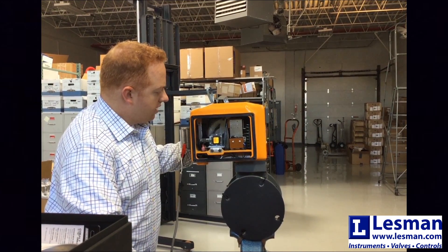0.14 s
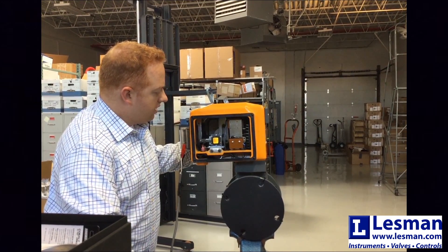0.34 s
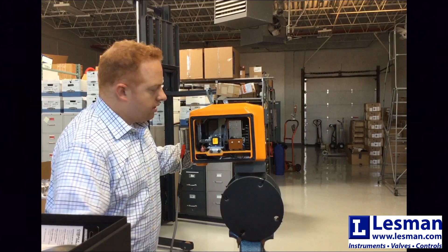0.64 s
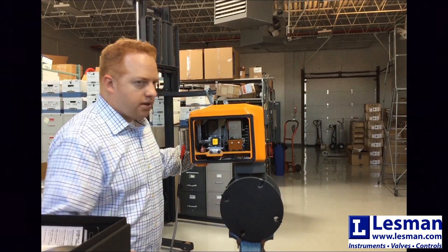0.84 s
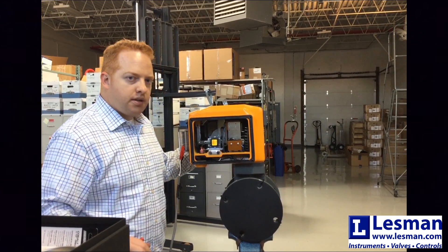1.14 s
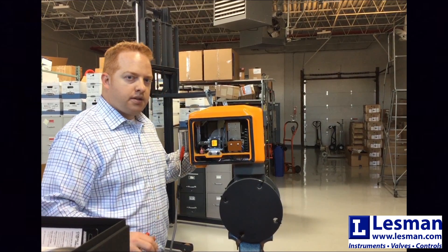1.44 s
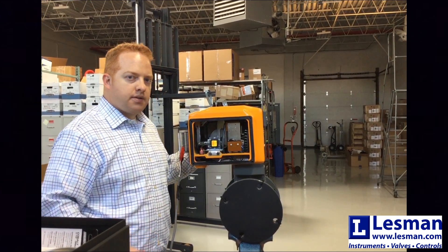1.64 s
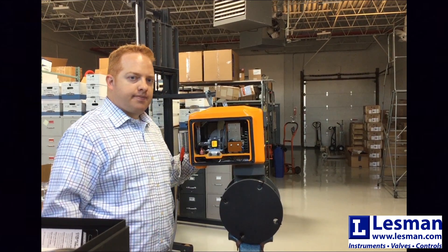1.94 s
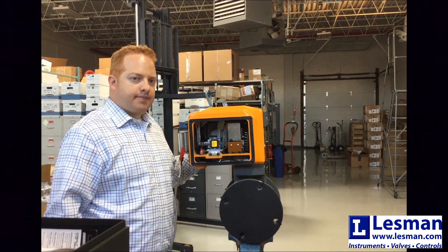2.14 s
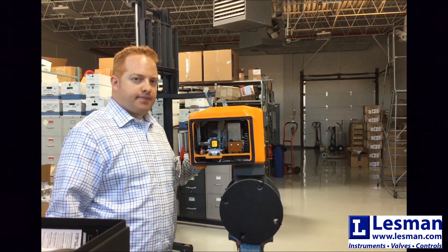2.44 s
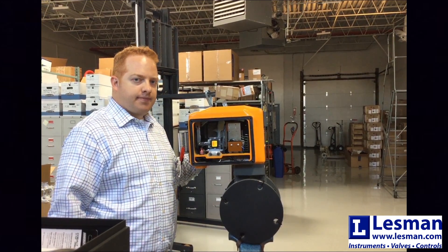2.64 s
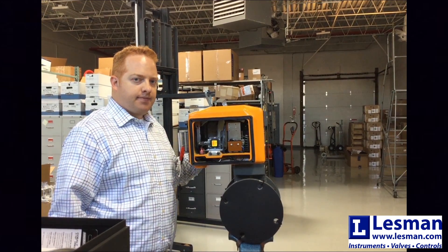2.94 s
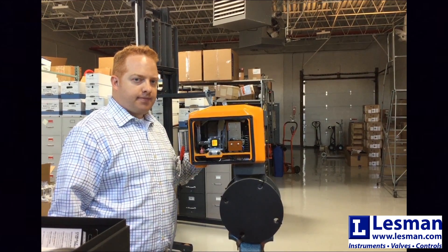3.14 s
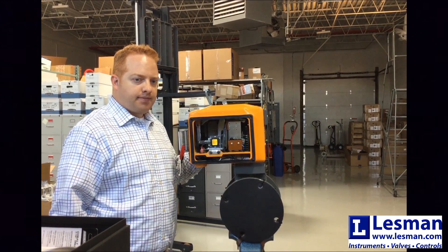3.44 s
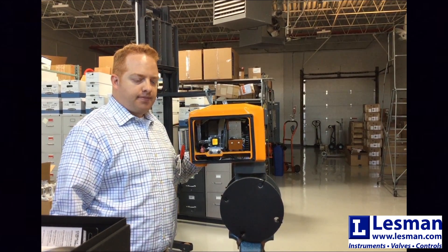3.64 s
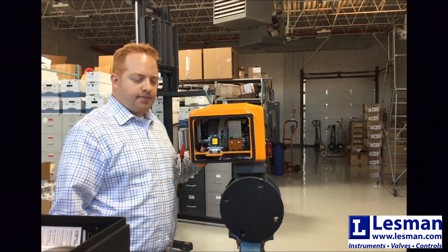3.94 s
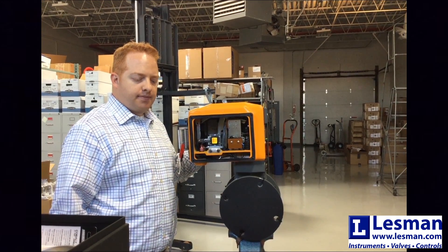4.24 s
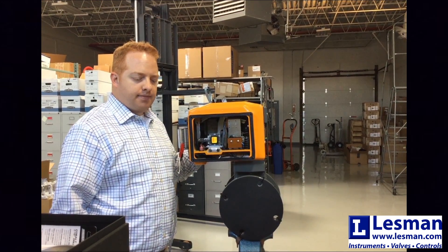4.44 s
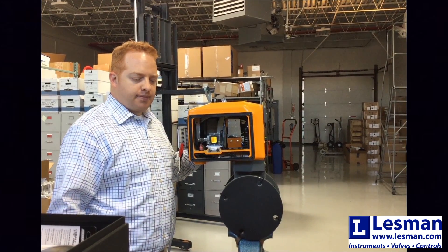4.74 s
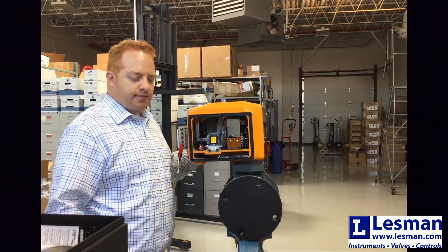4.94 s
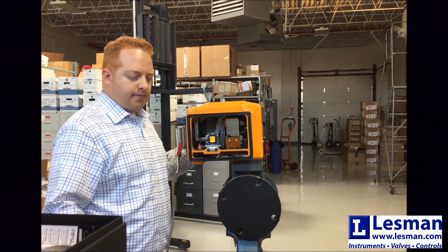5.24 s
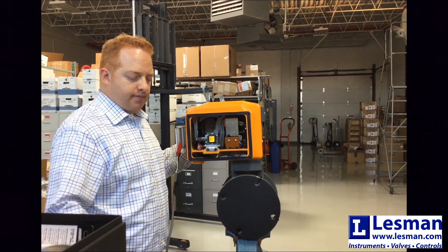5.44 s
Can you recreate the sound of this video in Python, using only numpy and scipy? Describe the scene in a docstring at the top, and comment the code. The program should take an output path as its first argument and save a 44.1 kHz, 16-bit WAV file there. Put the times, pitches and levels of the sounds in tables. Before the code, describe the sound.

In a large, hard-walled warehouse, an electric valve actuator hums over soft ventilation. Two small clicks lead straight into a loud solenoid snap that rings the casing, briefly overloads the microphone and echoes through the hall. The motor then takes up the valve and slows slightly. A few switches click, and the gears whine on steadily with a light rasp and a gentle throb.

```python
"""An electric valve actuator with an open housing, in a large, hard-walled warehouse.
Its geared induction motor hums almost unloaded over the ventilation while an earlier snap dies in the hall.
Two small clicks, then at 0.3 s a solenoid slams home, rings the casing and overloads the microphone.
From 0.9 s the motor takes up the valve and slows a little; a few switches click, and the drive
whines on, throbbing with its eccentric gears."""
import sys
import numpy as np
from scipy import signal
from scipy.fft import rfft, irfft, next_fast_len
from scipy.io import wavfile

SR = 44100
rng = np.random.default_rng(int(sys.argv[2]) if len(sys.argv) > 2 else 0)


def transcribe(signal):
    """Save signal, clipped to [-1, 1], as a 16-bit WAV file at the path in sys.argv[1]."""
    frames = np.atleast_2d(signal).T
    limited = np.clip(frames, -1, 1)
    pcm = np.round(limited * 32767).astype(np.int16)
    wavfile.write(sys.argv[1], SR, pcm)


N = 246546
TIME = np.arange(N) / SR
TAIL_TIME = np.arange(65536) / SR  # seconds since a hit

# bed of ventilation and motor fan: (frequency [Hz], level [dB/Hz])
AIR_BED = [(22, -96.5), (42, -77), (62, -75), (100, -75), (160, -79), (240, -77), (300, -72), (400, -90.5),
           (520, -86.5), (750, -87), (1400, -89), (2600, -85), (4000, -99), (5300, -104), (6500, -103),
           (8000, -108), (11000, -111), (15000, -121)]
# shaft speed against the valve: (time [s], speed [Hz])
SHAFT_SPEED = [(1.05, 57.27), (1.27, 57.04), (1.5, 57.16), (2.62, 56.36), (3.22, 56.8), (3.92, 56.24),
               (4.68, 56.73), (5.26, 56.08), (5.5, 56)]
# torque on the gear train: (time [s], load [0-1])
GEAR_LOAD = [(0, 0.01), (.92, 0.18), (1.12, 0.58), (1.7, 0.6), (2.08, 0.96), (5.59, 0.96)]
# rasp of sliding teeth at full load: (frequency [Hz], level [dB/Hz])
TOOTH_RASP = [(400, -105), (800, -84), (1300, -88.5), (1600, -79.5), (1850, -76.5), (2100, -79),
              (2330, -75), (2550, -82.5), (3000, -83), (3350, -96), (5500, -104), (8200, -104),
              (9600, -108), (15000, -122)]
# rotor tones, plus the gear tone at shaft order 28, which fades when running free: (shaft order, magnetic
# sideband, level [dB], boost when running free [dB])
ROTOR_TONES = [(12, 0, -69, 8.5), (15, 0, -60, 0.5), (16, 0, -59.5, 0), (17, 0, -53.5, 4.5),
               (17, 2, -63, 4), (26, 0, -67, 2), (28, 0, -53.5, -8)]
# gear tones: (shaft order, magnetic sideband, level [dB], loudest at load [1 = full])
MESH_TONES = [(14, 0, -63, 1.05), (17, 1, -52, 0.63), (18, 0, -61, .7), (27, 0, -61.5, .85),
              (29, 0, -60, 0.77), (28, 1, -51.5, 1), (35, -1, -59, .95), (35, 0, -48.5, .75),
              (35, 1, -56.5, 0.53), (42, -1, -53.5, 0.66), (42, 0, -51, 1.1), (42, 1, -63, .58),
              (49, -1, -61, 0.6), (49, 0, -55.5, .8), (49, 1, -55.5, .55), (54, 0, -63.5, 1.07),
              (56, -1, -65, .8), (56, 0, -60.5, .82)]
# brief swells of single tones: (time [s], half width [s], shaft order, boost [dB])
TONE_SWELLS = [(2.15, .18, 28, 8), (4.05, .2, 28, 3), (5.45, .18, 42, 4)]
# eccentric gears pressing the teeth once a turn: (period [shaft turns], swing [dB])
ECCENTRIC_GEARS = [(8, 0.8), (6, 1.26)]
# thin singing of the housing: (frequency [Hz], level [dB/Hz])
HOUSING_SING = [(3900, -125), (4380, -102), (4490, -89), (4600, -99), (5100, -125)]
# faint whistle: (frequency [Hz], final level [dB/Hz])
FAINT_WHISTLE = [(7300, -125), (8150, -98), (8900, -125)]
# low hum of motor and housing: (frequency [Hz], level [dB])
HUM_TONES = [(40.3, -70), (59.2, -59), (120, -54.5), (204.6, -56), (289.2, -56.5), (296.2, -52.5),
             (300, -61), (303.3, -72), (333.2, -59), (360, -63), (396, -69.5), (480, -75)]
# warehouse reverb: (frequency [Hz], level [dB], t60 [s])
HALL_REVERB = [(80, -13, 1.8), (288, -14, 0.68), (479, -5, .8), (700, -6.5, 0.89), (950, -9.5, 0.6),
               (1350, -6.5, 1.06), (2400, -8.5, 0.97), (3576, -9, 1.17), (5554, -14, 0.99),
               (8000, -18.5, 0.68), (14000, -15.5, .3)]
# EQ of the earlier, lighter snap, with little thump: (frequency [Hz], gain [dB])
EARLIER_EQ = [(300, -9), (1000, -6.5), (2500, 1), (8000, 5), (14000, 0)]
# switch and latch clicks:
# (time [s], tick level [dB/Hz], tick centre [Hz], tick t60 [s], ring [Hz], ring level [dB], ring t60 [s])
SWITCH_CLICKS = [(0.2605, -61.5, 1996, 0.09, 1640, -34, 0.25),
                 (0.2829, -58.5, 7800, 0.067, 3700, -25, 0.084),
                 (1.266, -94, 14000, 0.043, 14700, -64, .05), (1.346, -79.5, 9000, 0.052, 4480, -37, 0.031),
                 (1.346, -79, 14000, .03, 9878, -51, .06), (1.3502, -87, 14500, 0.053, 14400, -46, 0.13),
                 (1.732, -59.5, 1940, 0.037, 11400, -46, .03), (1.7353, -64.5, 1310, 0.22, 495, -42, 0.45)]
# brief rubs of sliding parts: (time [s], half width [s], centre [Hz], level [dB/Hz])
SLIDE_RUBS = [(0.272, 0.0086, 9000, -82), (0.316, .003, 3240, -45), (4.74, 0.023, 5670, -93)]
# plunger hits and bounces: (time [s], level [dB], extra crack [dB])
PLUNGER_HITS = [(0.3147, -7.5, 4), (.3160, 0, -0.5), (0.3208, -12.5, -6), (0.3604, -11.5, 1),
                (0.367, -16.5, 3), (0.3882, -21, 1), (.3935, -19.5, 1), (0.435, -24.5, -1.5)]
# ring of the casing: (frequency [Hz], level [dB], t60 [s])
CASING_MODES = [(1312, -12, 0.045), (1672, -11, 0.037), (1678, -23.5, 0.29), (1970, -27.5, 0.38),
                (2340, -34.5, 0.14), (2430, -2, 0.022), (2650, -30, 0.38), (3430, -16.5, .05),
                (3595, -29.5, .25), (4340, -28.5, 0.053), (4700, -39, 0.023), (5850, -11, .022)]
# crack of steel on steel: (frequency [Hz], level [dB/Hz], t60 [s])
STEEL_CRACK = [(200, -73, .1), (800, -58.5, 0.033), (1483, -35.5, 0.048), (2340, -45, 0.035),
               (3487, -49, 0.062), (5910, -45, 0.036), (10020, -50.5, 0.05), (15000, -52.5, 0.041)]
# shiver of the parts around the solenoid: (frequency [Hz], level [dB/Hz], t60 [s])
PARTS_SHIVER = [(25.52, -94, .3), (70, -43, .4), (250, -49.5, 0.42), (494, -50, 0.44), (900, -51.5, 0.49),
                (1610, -46, .3), (3553, -50, 0.47), (7040, -63.5, 0.37), (15000, -60, .23)]
# thump of the flexing cover panels: (frequency [Hz], level [dB], t60 [s], attack [s])
COVER_MODES = [(291.4, 7, 0.138, .012), (265.5, -9, 0.18, 0.0081), (96.2, -25, 0.52, 0.016),
               (203.3, -23.5, .2, .008)]

MAINS_HZ, PINION_TEETH = 60, 7
FREE_HZ, LOADED_HZ = 57.9, 56.25  # shaft speed before take-up, and typical at full load


def undb(db):
    """Decibels to gain."""
    return np.exp(np.asarray(db) * (np.log(10) / 20))


def curve(rows):
    """Automation from (time, value) points."""
    return np.interp(TIME, *np.transpose(rows))


def walk(rate):
    """Random wobble: ramps through rate points a second, spread near 1."""
    step = max(int(SR / rate), 1)
    knots = rng.standard_normal(N // step + 2)
    return 1.16 * (knots[:-1, None] + np.diff(knots)[:, None] * np.arange(step) / step).ravel()[:N]


def bump(s, half):
    """A smooth swell around s seconds."""
    return np.exp(-np.minimum(((TIME - s) / half) ** 2, 20))


def fade(t60):
    """Exponential decay after a hit."""
    return np.exp(-np.minimum(np.log(1000) * TAIL_TIME / t60, 20))


def delay(x, s, size=N):
    """Start a sound at s seconds."""
    return np.pad(x, (max(int(s * SR), 0), max(size - len(x), 0)))[:size]


def colour(x, rows):
    """EQ through (frequency, gain) points."""
    hz, db = np.transpose(rows)[:2]
    size = next_fast_len(len(x))
    pitch = np.log(np.fft.rfftfreq(size, 1 / SR) + 1)
    return irfft(rfft(x, size) * undb(np.interp(pitch, np.log(hz), db)), size)[:len(x)]


def bands(x, hz):
    """Split a sound into overlapping bands that add up to it again."""
    size = next_fast_len(len(x), True)
    spectrum = rfft(x, size)
    pitch = np.log(np.fft.rfftfreq(size, 1 / SR) + 1)
    masks = (np.interp(pitch, np.log(hz), share) for share in np.eye(len(hz)))
    return [irfft(spectrum * mask, size)[:len(x)] for mask in masks]


def noise(size=N):
    """White noise of 0 dB per Hz."""
    return rng.standard_normal(size) * np.sqrt(SR / 2)


def hiss(hz, db, skirt_db=-26):
    """A broad hump of noise around one frequency."""
    return colour(noise(len(TAIL_TIME)), [(hz / 6, db + skirt_db), (hz, db), (hz * 20, db + 2 * skirt_db)])


def sine(cycles):
    """A tone of rms 1 from its running count of cycles."""
    return np.sqrt(2) * np.sin(np.float32(2 * np.pi * (cycles - np.floor(cycles))))


def ring(hz, db, t60):
    """One struck mode."""
    return undb(db) * fade(t60) * np.sin(2 * np.pi * hz * TAIL_TIME)


def burst(rows, hits=((0, 0),)):
    """Noise whose bands die at their own rates; every hit (time, level) adds energy."""
    hz, _, t60s = np.transpose(rows)
    size = len(TAIL_TIME)
    out = 0
    for band, t60 in zip(bands(colour(noise(size), rows), hz), t60s):
        energy = sum(delay(undb(db) * fade(t60), s, size) ** 2 for s, db in hits)
        out += band * np.sqrt(energy)
    return out


def ventilation(waver_db=.92):
    """Moving air lays a soft, wavering bed under the scene."""
    return colour(noise(), AIR_BED) * undb(waver_db * walk(8.1))


def tooth_rasp(turns, load, grind_db, level_db=-2.5, free_db=-7, flicker_db=2):
    """Teeth rasp once a mesh, harder on one side of the pinion and at each magnetic pull."""
    angle = 2 * np.pi * turns
    mesh = 1 + .71 * np.cos(PINION_TEETH * angle)
    lopsided = 1 + .4 * (np.cos(angle) + np.cos(2 * angle))
    pull = 1 + .2 * np.cos(2 * np.pi * 2 * MAINS_HZ * TIME)
    rasp = bands(colour(noise() * mesh * lopsided * pull, TOOTH_RASP), [1208, 1777, 2390, 3100, 5080])
    low, mid, grind, edge, sizzle = (band * undb(flicker_db * walk(24)) for band in rasp)
    # tooth pressure brings up the finest sizzle
    total = low + mid + grind * undb(grind_db) + edge + sizzle * undb(-2 * (1 - load))
    return total * undb(level_db + free_db * (1 - load) ** 2)


def housing(x, t60=.12):
    """Many close, short-lived resonances of the open housing ripple the spectrum."""
    response = rng.standard_normal(len(TAIL_TIME)) * fade(t60)
    wet = signal.fftconvolve(x, response / np.linalg.norm(response))[:N]
    return (x + wet) / np.sqrt(2)


def churn(turns, slip=.24):
    """A swell once a turn of the slower eccentric gear, at a drifting random angle."""
    return np.cos(2 * np.pi * (turns / round(ECCENTRIC_GEARS[0][0]) + rng.random() + slip * walk(3.9)))


def whine(turns, load, off_load_db=-41, waver_db=2, churn_db=1.34, flutter_rad=.11):
    """Rotor and gear tones, some shifted by the magnetic pull at twice mains rate; load sets their mix."""
    tones = [(order, side, db + free_db * (1 - load)) for order, side, db, free_db in ROTOR_TONES]
    tones += [(order, side, db + off_load_db * (load - best) ** 2) for order, side, db, best in MESH_TONES]
    churns = [churn_db * churn(turns) for _ in range(3)]
    out = 0
    for k, (order, side, db) in enumerate(tones):
        cycles = order * turns + side * 2 * MAINS_HZ * TIME + rng.random()
        surge_db = sum(boost * bump(s, half) for s, half, which, boost in TONE_SWELLS
                       if which == order and side == 0)
        unsteady = min(order * FREE_HZ / 1800, 1)  # tones below 1800 Hz hold steadier
        gain = undb(db + surge_db + unsteady * (waver_db * walk(14) + churns[k % 3]))
        out += gain * sine(cycles + flutter_rad * walk(45) / (2 * np.pi))
    return out


def throb(turns, tightest_s=2.63, uneven_db=.48):
    """Tooth pressure in dB: the two eccentric gears beat, pressing hardest together at tightest_s."""
    since = turns - np.interp(tightest_s, TIME, turns)
    swing_db = sum(db * np.cos(2 * np.pi * since / round(period)) for period, db in ECCENTRIC_GEARS)
    return swing_db + uneven_db * walk(14)


def singing(turns, load, churn_db=2.5, waver_db=2, free_db=2):
    """The housing sings thinly near 4.5 kHz, swelling with the slower eccentric gear."""
    band = colour(noise(), HOUSING_SING)
    return band * undb(churn_db * churn(turns) + waver_db * walk(2.9) + free_db * (1 - load))


def whistle(rise_db_per_s=.5):
    """A faint, airy whistle grows as the valve travels."""
    return colour(noise(), FAINT_WHISTLE) * undb(rise_db_per_s * (TIME - TIME[-1]))


def hum(start_db=-3, rise_db_per_s=.67, drift_rad=.35):
    """Motor and housing hum, slowly building; the close tones near 300 Hz beat."""
    out = 0
    for hz, db in HUM_TONES:
        gain = undb(db + walk(2.8))
        out += gain * sine(hz * TIME + rng.random() + drift_rad * walk(3.5) / (2 * np.pi))
    return out * undb(start_db + rise_db_per_s * TIME)


def motor(take_up_s=.9, backlash_turns=.0034, strain_db_per_hz=1.2, grind_db_per_hz=3):
    """The whole drive: the more the valve slows the shaft, the louder the gears and their 2.4 kHz grind."""
    load = curve(GEAR_LOAD)
    speed = curve([(take_up_s, FREE_HZ), *SHAFT_SPEED])
    slowed_hz = LOADED_HZ - speed
    turns = np.cumsum(speed) / SR + backlash_turns * walk(14)
    rasp = housing(tooth_rasp(turns, load, grind_db=grind_db_per_hz * slowed_hz - .5))
    strain_db = strain_db_per_hz * slowed_hz * load - .3
    train = (whine(turns, load) + rasp) * undb(strain_db + throb(turns))
    return train + singing(turns, load) + whistle() + hum()


def hall(x, predelay_s=.03, build_s=.052):
    """Diffuse echo that builds up after the first wall is reached."""
    response = burst(HALL_REVERB) * (1 - np.exp(-TAIL_TIME / build_s)) * 2 * np.pi / SR
    return delay(signal.fftconvolve(x, response), predelay_s)


def earlier_snap(snap, lead_s=.5, level_db=-5):
    """The hall still holds the tail of a lighter snap, lead_s ahead of the main one."""
    echo = np.pad(hall(colour(snap, EARLIER_EQ)), (0, N))
    return echo[int(lead_s * SR):][:N] * undb(level_db)


def switches(detune=.035):
    """Small contacts tick and ring with a close pair of modes; sliding parts rub softly."""
    ticks = 0
    for s, db, hz, t60, ring_hz, ring_db, ring_t60 in SWITCH_CLICKS:
        pair = ring(ring_hz, ring_db - 2, ring_t60) + ring(ring_hz * (1 + detune), ring_db - 4, ring_t60)
        ticks += delay(hiss(hz, db) * fade(t60) + pair, s)
    rubs = sum(delay(hiss(hz, db), s - .5) * bump(s, half) for s, half, hz, db in SLIDE_RUBS)
    return ticks + rubs


def solenoid(cover_s=.319, shiver_db=-1, rebound_s=.3595, rebound_db=-4):
    """The plunger hits and bounces, the cover swings after it; returns the clack and the casing's ring."""
    casing = sum(ring(hz, db, t60) for hz, db, t60 in CASING_MODES)
    rings = sum(undb(db) * delay(casing, s) for s, db, _ in PLUNGER_HITS)
    crack = delay(burst(STEEL_CRACK, [(s, db + extra_db) for s, db, extra_db in PLUNGER_HITS]), 0)
    cover = sum(ring(hz, db, t60) * (1 - np.exp(-TAIL_TIME / attack)) for hz, db, t60, attack in COVER_MODES)
    # the largest bounce gives the cover a second, brief push
    thump = delay(cover, cover_s) + undb(rebound_db) * delay(cover * fade(.03), rebound_s)
    shiver = undb(shiver_db) * delay(burst(PARTS_SHIVER), PLUNGER_HITS[0][0])
    return crack + thump + shiver, rings


def scene(click_send_db=-8, ring_send_db=-7):
    """Actuator, hall and ventilation at one microphone."""
    clack, rings = solenoid()
    clicks = switches()
    # the small parts radiate mostly out of the open front, less into the hall
    snap_send = clack + undb(ring_send_db) * rings
    echo = hall(snap_send + undb(click_send_db) * clicks)
    return (earlier_snap(snap_send) + ventilation() + motor() + clicks + clack + rings + echo)[None]


def record(dry, top_hz=15500):
    """The snap clips the input; a steep low-pass cuts the top."""
    lowpass = signal.ellip(10, .1, 90, top_hz, fs=SR, output="sos")
    return signal.sosfilt(lowpass, np.clip(dry, -1, 1))


dry = scene()
out = record(dry)
transcribe(out)
```